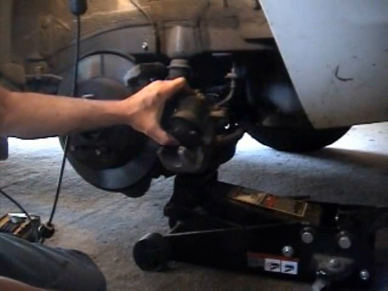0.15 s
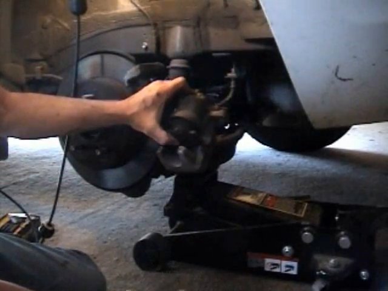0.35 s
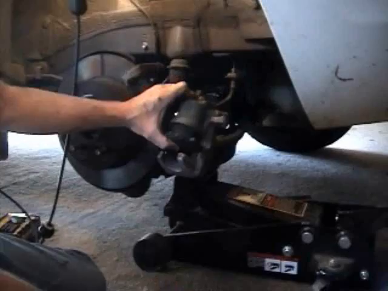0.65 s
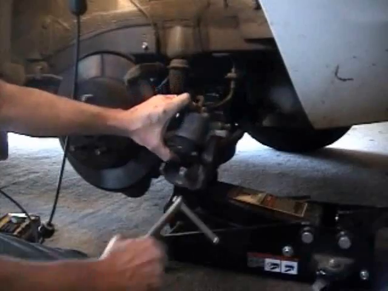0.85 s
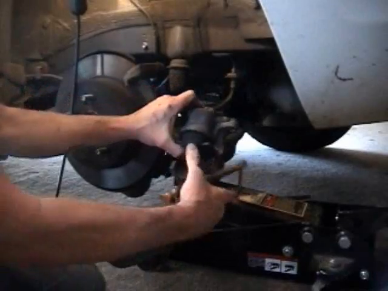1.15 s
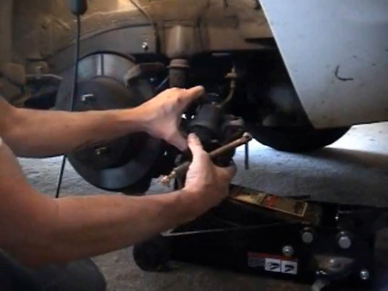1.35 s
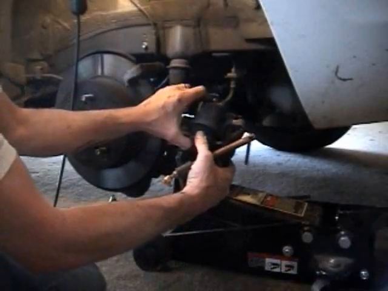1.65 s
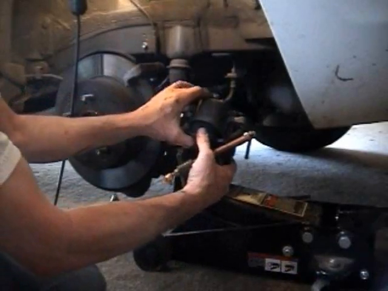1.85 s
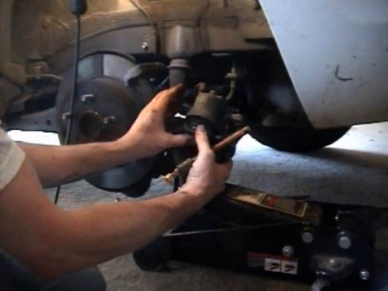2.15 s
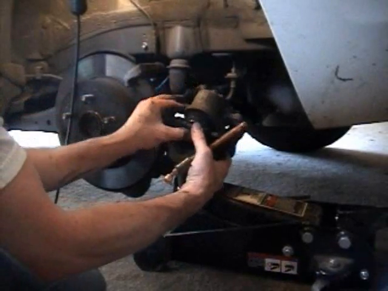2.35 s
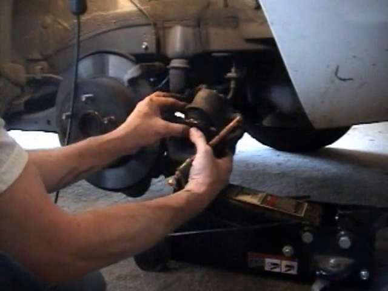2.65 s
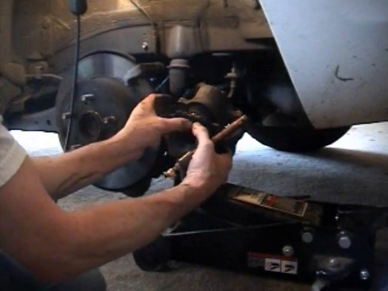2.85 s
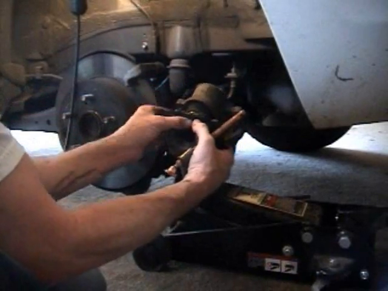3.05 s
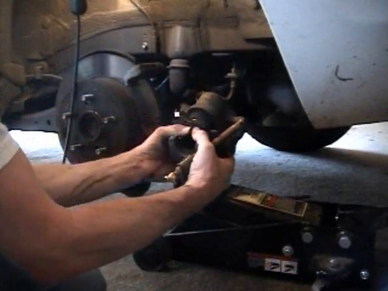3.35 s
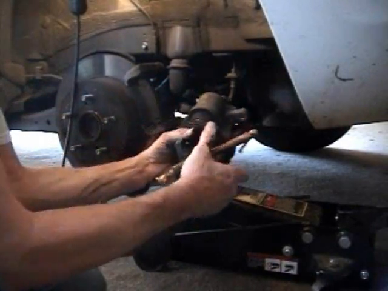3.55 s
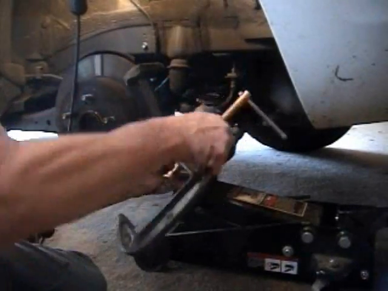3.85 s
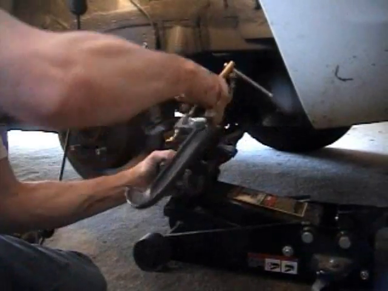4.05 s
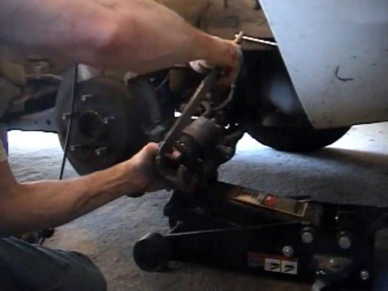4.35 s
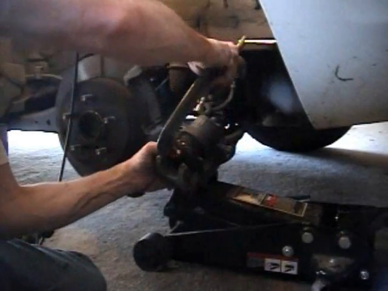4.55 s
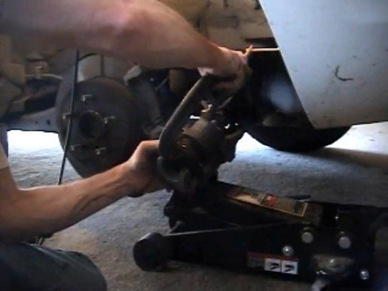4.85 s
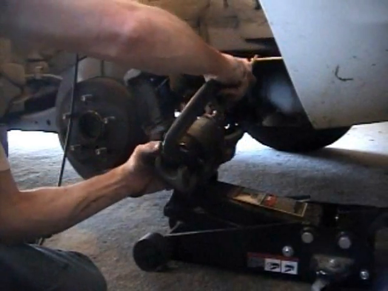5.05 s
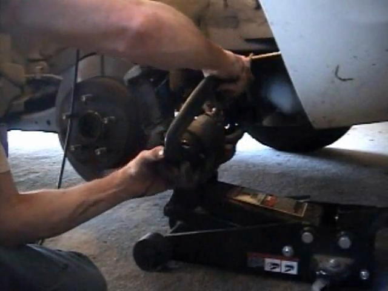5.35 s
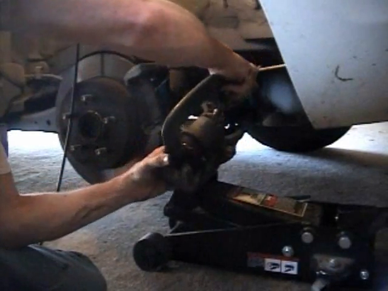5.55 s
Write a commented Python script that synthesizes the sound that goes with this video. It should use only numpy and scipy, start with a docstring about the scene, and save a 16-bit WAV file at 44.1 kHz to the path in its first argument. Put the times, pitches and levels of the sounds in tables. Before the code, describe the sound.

Dull room noise and a faint, wavering low motor hum run throughout in a garage with a short tail. Close by, rusty steel parts rub faintly; a thin high ringing tap comes at 0.1 s and a soft clink at 0.4. Low muffled spring bumps at 0.85-1.0 s lead into a quick cluster of clinks, with a hard clack and low microphone thump at 1.3. Sparse taps follow at 1.8 and 2.4, a brighter pair near 2.6, then near quiet. A strong, lower-pitched clank lands at 3.5, followed by lighter clinks and scraping until 3.8. Hollow, boomy spring knocks sound at 4.1 and 4.5. From 4.8 rapid bright clinks and gritty sliding build to the loudest, overloaded clang at 5.2, then dull spring thuds at 5.3-5.4 and a last sharp clink with scraping around 5.65.

```python
"""Brake parts handled in a garage

At a wheel, close to the microphone, a steel clamp and an old brake pad are set against a brake caliper.
The steel parts clink by noisy chatter and damped modes, and slide by random stick-slip clicks.
Two strong blows overload the microphone with a low thump, a short push and a brief ring.
The clamp's sliding handle rings on two tones; bumps and light strokes sound the coils of the suspension spring.
Wheel-arch reflections and a short garage tail surround the work, over dull room noise and a motor's wavering sines.
"""
import sys
import numpy as np
from scipy import signal
from scipy.fft import rfft, irfft, next_fast_len
from scipy.io import wavfile

SR = 44100
rng = np.random.default_rng(int(sys.argv[2]) if len(sys.argv) > 2 else 0)


def file_out(sig):
    """Save sig as 16-bit WAV at sys.argv[1]."""
    # one column per channel
    cols = np.atleast_2d(sig).T
    # limit, then scale
    lim = np.clip(cols, -1, 1)
    pcm = np.round(lim * 32767).astype(np.int16)
    wavfile.write(sys.argv[1], SR, pcm)


N = 250591

TIME = np.arange(N) / SR
SHORT = TIME[:SR // 2]   # half a second, for one hit
LEFT_RIGHT = np.array([[1], [-1]])   # opposite signs in the two channels
CUTOFF_HZ = 7800


def from_db(db):
    """Decibels to gain."""
    return 10 ** (np.asarray(db) / 20)


def rms_one(x):
    """Scale to rms 1."""
    return x / np.sqrt(np.mean(x ** 2) + 1e-20)


def attack_db(x):
    """Level of the first 25 ms."""
    return 10 * np.log10(np.mean(x[:SR // 40] ** 2) + 1e-20)


def at_hz(points, hz):
    """Read a table on a log-frequency axis."""
    points = np.array(points)
    return np.interp(np.log(np.maximum(hz, 1)), np.log(points[:, 0]), points[:, 1])


def bins(size):
    """Frequencies of a spectrum."""
    return np.arange(size // 2 + 1) * SR / size


def colour(x, curve):
    """Causal (minimum-phase) filter that follows a table of frequency_hz, level_db."""
    size = next_fast_len(x.shape[-1] // 2 + 1024) * 2
    cepstrum = irfft(np.log(from_db(at_hz(curve, bins(size)))), size)
    # folding the cepstrum forward in time gives the minimum phase
    cepstrum[1:size // 2] *= 2
    cepstrum[size // 2 + 1:] = 0
    response = np.exp(rfft(cepstrum))
    return irfft(rfft(x, size) * response, size)[..., :x.shape[-1]]


def band(x, low_hz, high_hz):
    """Band-pass."""
    sos = signal.butter(2, [low_hz, high_hz], "band", fs=SR, output="sos")
    return signal.sosfilt(sos, x)


def add(out, start_s, sound):
    """Mix a sound in at its start time."""
    at = int(start_s * SR)
    out[..., at:at + sound.shape[-1]] += sound[..., :N - at]


def ringing(modes, extra_db=0, detune=0, freedom=1):
    """Decaying sines; a tight grip (low freedom) damps them; random signs stand for the spot that is struck."""
    hz, db, t60_s = np.transpose(modes)
    hz = hz * (1 + detune * rng.standard_normal(len(hz)))
    gain = from_db(db + extra_db) * rng.choice([-1, 1], len(hz))
    decay = np.exp(-np.log(1000) * SHORT / (t60_s[:, None] * freedom))
    return gain @ (np.sin(2 * np.pi * hz[:, None] * SHORT) * decay)


def slips(per_s, spread_db):
    """Tiny stick-slip clicks of uneven size, at random moments."""
    clicks = (rng.random(N) < per_s / SR) * rng.standard_normal(N)
    return clicks * from_db(spread_db * np.minimum(rng.exponential(1, N), 4))


def through(force, modes, freedom):
    """A running force keeps a body's modes ringing; rms 1."""
    return rms_one(signal.fftconvolve(force, ringing(modes, freedom=freedom))[:N])


# Caliper, pad and clamp held together, relative levels: frequency_hz, level_db, free_t60_s
STEEL = [(950, -15.5, 0.037), (996, -7.5, 0.15), (1160, -3, 0.081), (1238, -4.5, 0.079), (1391, -2, 0.16),
         (1522, 0.5, 0.13), (1710, -4, 0.033), (1880, -4.5, 0.22), (1943, -11, 0.093), (2214, 1, 0.14),
         (2380, -7.5, 0.14), (2760, -25, 0.09), (2860, -15.5, .12), (2850, -7, 0.42), (3230, -18.5, 0.059),
         (3568, 5, 0.082), (3760, 3.5, 0.19), (3920, -13, 0.035), (4280, 9.5, 0.043), (4540, 5.5, 0.051),
         (4670, 6.5, 0.059), (5110, 10, 0.056), (5700, -9.5, .07), (6500, -4, 0.046), (7320, 4.5, 0.08),
         (7600, -7, 0.057), (7360, -11.5, .1), (8020, -2, 0.091)]
# Colour of the crack of a contact: frequency_hz, level_db
CRACK = [(100, -6.5), (400, -3.5), (800, 5), (1500, 7), (3000, 1.5), (4800, -1), (5300, -0.5), (5900, -2.5),
         (6900, 3.5), (7800, 0.5)]


def clink(pitch_hz, spot_db, chatter_ms, freedom):
    """Rough faces chatter and bounce on; each grip shifts the modes, which gather round the struck spot's pitch."""
    chatter = rng.standard_normal(len(SHORT)) * np.exp(-SHORT * 1000 / chatter_ms)
    bounces = (rng.random(len(SHORT)) < 900 / SR) * rng.standard_normal(len(SHORT))   # 900 per second
    bounces = rms_one(bounces) * np.exp(-SHORT / 0.018)
    crack = from_db(20) * colour(chatter + from_db(-9) * freedom * bounces, CRACK)
    uneven_db = 1.0 * rng.standard_normal(len(STEEL))
    body = ringing(STEEL, uneven_db, detune=0.0066, freedom=freedom)
    spot = ringing([(pitch_hz, spot_db, 0.051)], freedom=freedom)
    # the ring builds up while the faces chatter
    hit = crack + (body + spot) * (1 - np.exp(-SHORT / 0.00077))
    # the spot also favours the modes near its pitch
    width = 1.36
    return colour(hit, [(pitch_hz / width, 0), (pitch_hz, 0.34 * spot_db), (pitch_hz * width, 0)])


# Centres of the octave bands where a clink is balanced: frequency_hz
OCTAVES_HZ = [850, 1700, 3400, 6200]


def balanced(hit, level_db, pitch_hz, below_db, above_db):
    """A light part has little bass, a blunt contact little treble: set the attack in each octave band."""
    octaves = np.log2(np.array(OCTAVES_HZ) / pitch_hz)
    wanted_db = level_db - np.where(octaves < 0, below_db, above_db) * abs(octaves)
    balance = []
    for hz, wanted in zip(OCTAVES_HZ, wanted_db):
        octave = band(hit[:SR // 20], hz / np.sqrt(2), hz * np.sqrt(2))
        balance.append((hz, wanted - attack_db(octave)))
    return colour(hit, balance)


# Steel on steel at the caliper, level before a trim; falls are away from the pitch of the struck spot:
# start_s, level_db, pitch_hz, fall_below_db_per_octave, fall_above_db_per_octave, spot_tone_db,
# chatter_ms, freedom (ring time as share of the free one)
CLINKS = [(0.134, -44, 5230, 4, -5, 2, 1.05, 0.36), (0.414, -44, 2094, 20, 26, 16, 14, 0.87),
          (1.106, -40, 2960, 9, 6.5, -2, 5.7, 0.37), (1.128, -36, 2220, 17, 5.5, 11, 6.1, 1),
          (1.189, -41.5, 5220, 7, 12, 7, 1.9, 0.65), (1.223, -45.5, 4340, 6.5, 17, 8, 9.2, 0.93),
          (1.327, -28.5, 2090, 2.5, -2, 16.5, 3.6, 0.41), (1.337, -33, 3660, 11, 13, 2, 3.1, .9),
          (1.355, -34.5, 2000, 19, 4, 7, 3.7, 1), (1.38, -45, 1900, 7, 3, 3, 3, 1),
          (1.39, -43, 1260, 6, 2, 7, 3.6, 0.9), (1.432, -46, 1840, 6, 6, 14.5, 2.7, 1),
          (1.4642, -45.5, 3580, 3, -0.5, -1, 11, 1), (1.571, -55, 2380, 9, 10, 11, 2.8, 0.71),
          (1.8328, -37, 1200, 9.5, 12, 7, 1.94, 0.36), (2.3686, -36, 1400, 14, 12.5, 19, 3, 0.49),
          (2.418, -45.5, 1250, 13, 13.5, 9, 2.7, 1), (2.549, -56, 1214, 0, 3, 10, 2, 1),
          (2.577, -30, 1770, 8.5, 8.5, -12, 2.2, 0.33), (2.639, -32.5, 1907, 22, 9.5, 19.5, 1.2, 0.64),
          (3.1124, -58.5, 3380, -1, 11, 3, 4, 1), (3.4654, -21, 1226, 38, 8, 16, 10, 0.47),
          (3.557, -49.5, 1900, 6, 9, 7, 3.7, .9), (3.583, -42.5, 1770, 12, 5.5, 15, 4.4, 0.56),
          (3.61, -44, 5140, 4, -1, -1, 3, 1), (3.624, -28.5, 3414, 8.5, 8, 11.5, 1.8, 0.34),
          (3.66, -47, 3460, 4.5, 20, 6, 2.3, 0.74), (3.701, -47, 2800, 12, 7, 10, 4.3, 0.64),
          (3.7548, -46.5, 1930, 20, 16.5, 14, 2.6, 0.35), (4.499, -44, 5030, 4, 6, 7, 4.9, 1),
          (4.8276, -30.5, 4520, 10, 7, 15, 4.7, 0.58), (4.841, -34.5, 3820, 3, 10, 16.5, 1.4, 1),
          (4.878, -35.5, 1423, 2.5, 7.5, 13, 2.2, 0.65), (4.944, -47, 3500, 4.5, 2.5, 8, 5.6, 0.91),
          (4.97, -51.5, 1890, 20, 1.5, 11, 3, 0.56), (5.0358, -39, 4620, 9, 13, 13, 2.3, 1),
          (5.066, -29.5, 4450, 11, 10, 19, 5.5, 0.48), (5.1683, -31, 3780, 8.5, 9.5, 15, 3, 1),
          (5.18, -29, 5080, 2.5, -3, 3.5, 7.3, 0.58), (5.2008, -17.5, 2977, 6, 4, 15, 4, 0.5),
          (5.212, -36.5, 2985, 2, 11, 15, 2, 0.7), (5.642, -39.5, 1730, 12, 4.5, 15, 1.1, 0.31),
          (5.657, -25.5, 4350, 16.5, 33, 19, 5.1, 0.65)]


def clinks(trim_db=1.5, left_over_right_db=-0.7, graze_db=-22, graze_s=0.0034):
    """Steel parts meet, each blow led in by a faint graze of an edge."""
    out = np.zeros((2, N))
    for start_s, level_db, pitch_hz, below_db, above_db, spot_db, chatter_ms, freedom in CLINKS:
        hit = clink(pitch_hz, spot_db, chatter_ms, freedom)
        hit = balanced(hit, level_db, pitch_hz, below_db, above_db)
        hit = hit * from_db(trim_db + left_over_right_db / 2 * LEFT_RIGHT)
        add(out, start_s - graze_s, from_db(graze_db) * hit)   # an edge grazes just before the faces meet
        add(out, start_s, hit)
    return out


# Low thumps as two strong blows overload the microphone, level over the first 25 ms: start_s, level_db
OVERLOADS = [(1.327, -32.5), (5.202, -36.5)]


def overload(push_s=0.0022, ring_hz=170, ring_db=-12, ring_t60_s=0.02):
    """A short low push and a brief 170 Hz ring, the overloaded microphone's thump."""
    out = np.zeros(N)
    push = SHORT / push_s * np.exp(1 - SHORT / push_s)
    for start_s, level_db in OVERLOADS:
        thump = band(push + ringing([(ring_hz, ring_db, ring_t60_s)]), 20, 560)
        add(out, start_s, thump * from_db(level_db - attack_db(thump)))
    return out


# The clamp's handle slides to its stop: start_s, lower_tone_db, upper_tone_db
HANDLE_HITS = [(0.134, -38, -37.5), (1.192, -41, -60), (3.624, -47, -56), (5.068, -42, -60)]
# The handle's lower and upper tone: frequency_hz
HANDLE_HZ = [5206, 6648]
HANDLE_T60_S = 0.18


def handle():
    """The loose steel bar rings with two clear tones."""
    out = np.zeros(N)
    for start_s, *tones_db in HANDLE_HITS:
        modes = [(hz, db, HANDLE_T60_S) for hz, db in zip(HANDLE_HZ, tones_db)]
        add(out, start_s, ringing(modes))
    return out


# Bumps on the suspension spring, level over the first 25 ms:
# start_s, level_db, brightness_hz, contact_ms, freedom (ring time as share of the free one)
BUMPS = [(0.842, -45, 293, 170, 1), (0.957, -32, 173, 24, 0.81), (0.986, -39, 153, 14, 0.6),
         (4.104, -30.5, 1370, 26, 0.33), (4.122, -38, 940, 60, 1), (4.458, -27.5, 835, 24, 0.46),
         (4.474, -32.5, 424, 41, 0.86), (4.573, -49, 295, 12, 0.76), (5.006, -34.5, 1360, 43, 0.83),
         (5.287, -27, 605, 12.5, 0.26), (5.305, -30.5, 480, 9.5, 0.91), (5.377, -35.5, 420, 17, 0.8),
         (5.645, -40, 900, 17, 0.4)]
# The spring and its strut, relative levels: frequency_hz, level_db, free_t60_s
SPRING = [(173.7, 5, 0.15), (180, 7, 0.2), (204, -8, 0.54), (226.3, -5, 0.3), (341.2, -3, 0.48),
          (382.4, -2.5, 0.6), (422, -8, 0.4), (472, -1, 0.079), (545.5, 2.5, 0.23), (714, -17, 0.96),
          (809, 4, 0.22), (860, -4.5, 0.76), (932, -7, 0.75), (1030, -14, 0.12), (1286, 1.5, 0.093),
          (1470, -6, 0.41), (2000, -18, 0.3), (2160, 3, 0.27), (2392, 7, 0.13), (2920, 6, 0.14)]
# Colour of the thud of contact: frequency_hz, level_db
THUD = [(60, -8.5), (150, 1.5), (400, -2.5), (800, 3), (1300, -4), (1800, -8), (2500, -4.5), (4000, -3)]


def spring(thud_db=21, low_hz=130, top_hz=2600, spread_db=1.5, swell_cycles=1.36, grip_detune=0.007):
    """A soft, rubbing contact; the boom swells as bending waves run along the coil, slower for a duller bump."""
    out = np.zeros(N)
    for start_s, level_db, bright_hz, contact_ms, freedom in BUMPS:
        rub = rng.standard_normal(len(SHORT)) * np.exp(-SHORT * 1000 / contact_ms)
        uneven_db = spread_db * rng.standard_normal(len(SPRING))
        coil = ringing(SPRING, uneven_db, grip_detune, freedom)
        boom = from_db(thud_db) * colour(rub, THUD) + coil
        swell = 1 - np.exp(-SHORT * bright_hz / swell_cycles)
        # frequency_hz, level_db: a soft contact dulls the sound above its brightness
        softness = [(bright_hz / 8, -3), (bright_hz, 0), (bright_hz * 2, -8),
                    (bright_hz * 4, -19), (bright_hz * 12, -22)]
        boom = band(colour(boom * swell, softness), low_hz, top_hz)
        add(out, start_s, boom * from_db(level_db - attack_db(boom)))
    return out


# Something brushes along the spring: peak_s, level_db, half_length_s
BRUSHES = [(0.873, -52, 0.029), (0.98, -43, 0.04), (4.097, -48.5, 0.045), (5.164, -49, 0.026)]
# Colour of the brushed coil: frequency_hz, level_db
BRUSH_COLOUR = [(200, -18), (380, -7), (700, -20), (1400, 4), (2400, -3.5), (3000, -1), (4500, -13)]


def brushing(rough_db=-6, freedom=0.21):
    """A light stroke wakes the upper modes of the coil."""
    force = slips(per_s=4000, spread_db=3.6)
    rough = from_db(rough_db) * rms_one(band(force, 600, 4500))
    sound = rms_one(colour(through(force, SPRING, freedom) + rough, BRUSH_COLOUR))
    strokes = sum(from_db(level_db) * np.exp(-((TIME - peak_s) / half_s) ** 2)
                  for peak_s, level_db, half_s in BRUSHES)
    return sound * strokes


# The parts slide on each other, mostly just after a blow, level before a trim:
# peak_s, level_db, fade_s (time to fall to 1/e)
SLIDES = [(0.0, -50.5, 0.16), (0.62, -50.5, 1), (0.98, -45.5, 0.15), (1.19, -48.5, 0.15),
          (1.36, -39, 0.082), (2.5, -54, 0.33), (3.12, -55, .08), (3.66, -47.5, 0.14), (4.149, -51.5, 0.21),
          (4.52, -47, 0.027), (4.852, -35, 0.077), (4.935, -40, .04), (5.08, -41, .07), (5.23, -50, .04),
          (5.67, -38, 0.17)]
# Colour of the rusty faces: frequency_hz, level_db
RUB_COLOUR = [(300, -1), (1000, -5), (2300, -5), (3500, -10), (5000, -15.5), (6000, -7.5), (7500, -16.5)]
SLIDE_RISE_SHARE = 0.22   # a slide builds up in this share of the time it takes to die away


def rubbing(ring_db=-3, freedom=0.27, holding_db=-65, trim_db=-3.0):
    """Rusty faces slide, and rub faintly even while just held; each slip ticks and stirs the damped steel."""
    force = slips(per_s=2200, spread_db=0)
    ticks = rms_one(band(force, 220, CUTOFF_HZ))
    sound = ticks + from_db(ring_db) * through(force, STEEL, freedom)
    effort = from_db(holding_db)
    for peak_s, level_db, fade_s in SLIDES:
        age = (TIME - peak_s) / fade_s
        stroke = np.exp(-np.maximum(age, -age / SLIDE_RISE_SHARE))
        effort = np.maximum(effort, from_db(level_db) * stroke)
    return rms_one(colour(sound, RUB_COLOUR)) * effort * from_db(trim_db)


# How long the garage rings: frequency_hz, t60_s
GARAGE_T60 = [(150, 0.64), (1000, 0.27), (3500, 0.29), (7500, 0.19)]


def garage(x, near_db=-7, near_s=0.0035, near_side=1.23, tail_db=-11, tail_side=0.52, build_s=0.0007):
    """Quick wide reflections from the wheel arch, then a tail that dies sooner in the treble."""
    mid, side = rng.standard_normal((2, len(SHORT)))
    side = side * LEFT_RIGHT
    edges = np.geomspace(80, 10000, 7)
    tail = 0
    for k, (low_hz, high_hz) in enumerate(zip(edges, edges[1:])):
        t60_s = at_hz(GARAGE_T60, np.sqrt(low_hz * high_hz))
        decay = np.exp(-np.log(1000) * SHORT / t60_s)
        # alternate signs keep neighbouring bands from cancelling where they meet
        tail = tail + band(mid + tail_side * side, low_hz, high_hz) * decay * (-1) ** k
    tail = tail * (1 - np.exp(-SHORT / build_s))
    near = band(mid + near_side * side, 200, 10000) * np.exp(-SHORT / near_s)
    near = near * (SHORT > 0.0004)   # the first reflection comes after 0.4 ms
    response = from_db(near_db) * rms_one(near) + from_db(tail_db) * rms_one(tail)
    response = response / np.sqrt(2 * len(SHORT))
    return signal.fftconvolve(x, response, axes=1)[:, :N]


# Colour of the room noise, relative density: frequency_hz, level_db
AIR = [(15, -39), (25, -21), (60, 1), (123, -8), (146, -1), (181, -5), (209, -8.5), (373, -9.5), (401, -1),
       (464, -13), (576, -10), (619, -12), (2120, -25), (6920, -34.5), (8000, -40.5), (10400, -66),
       (17600, -120)]
# Stereo width of the room noise: frequency_hz, side_against_mid_db
WIDTH = [(30, -25.5), (150, -6.5), (300, -5.5), (1000, 3), (7000, -1.5)]
# Wavering lines of the motor, rms level: frequency_hz, level_db, line_width_hz
HUM = [(77.6, -59, 11), (122.2, -53, 3.3), (180.5, -54.5, 5.62), (409.7, -57, 6.36), (571, -57.5, 5.3)]


def background(air_db=-46):
    """Dull room noise, and a motor's lines that waver as their phase drifts at random."""
    mid, side = colour(rng.standard_normal((2, N)), AIR)
    air = rms_one(mid + colour(side, WIDTH) * LEFT_RIGHT)
    hum = 0
    for hz, level_db, width_hz in HUM:
        wander = np.cumsum(rng.standard_normal(N)) * np.sqrt(2 * np.pi * width_hz / SR)
        hum = hum + from_db(level_db) * np.sqrt(2) * np.sin(2 * np.pi * hz * TIME + wander)
    return from_db(air_db) * air + hum


def scene():
    """The work at the wheel, heard in the garage."""
    work = clinks() + overload() + handle() + spring() + brushing() + rubbing()
    return work + garage(work) + background()


def record(dry):
    """Peaks are rounded and the top is cut."""
    rounded = 0.9 * np.tanh(dry / 0.9)
    return signal.sosfilt(signal.ellip(10, 0.3, 70, CUTOFF_HZ, fs=SR, output="sos"), rounded)


dry = scene()
out = record(dry)
file_out(out)
```